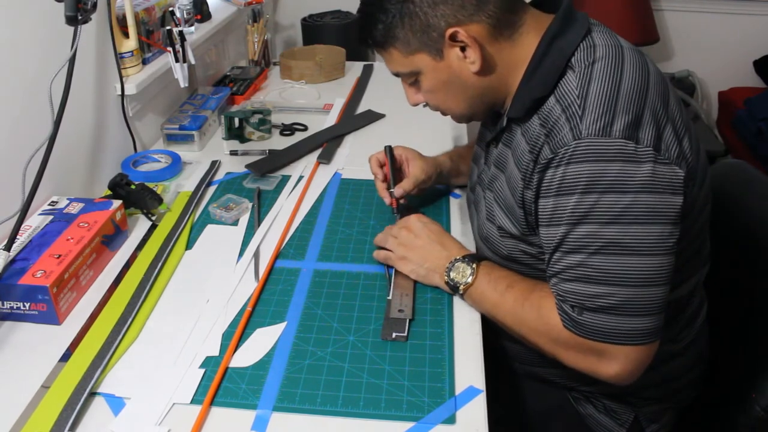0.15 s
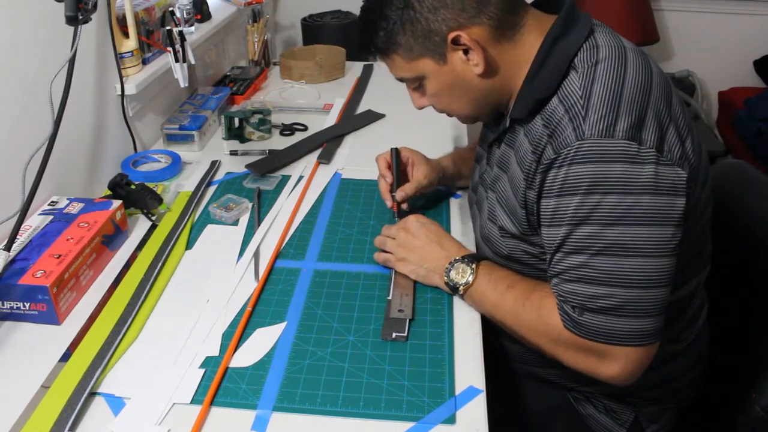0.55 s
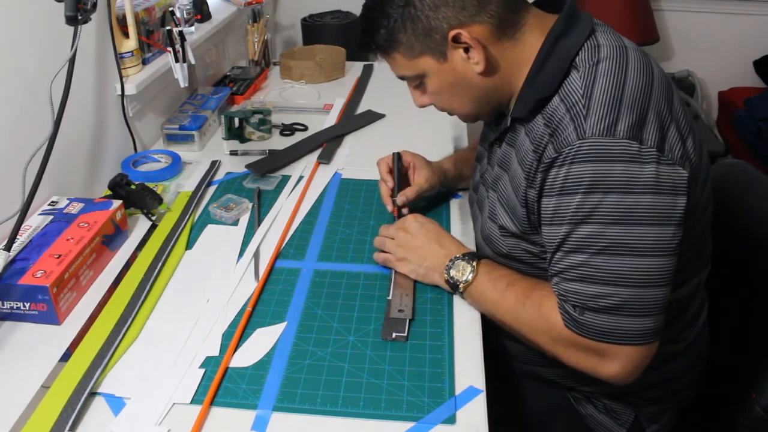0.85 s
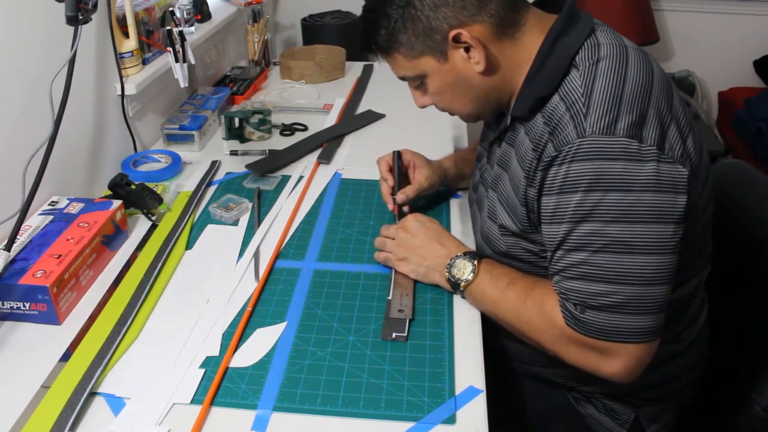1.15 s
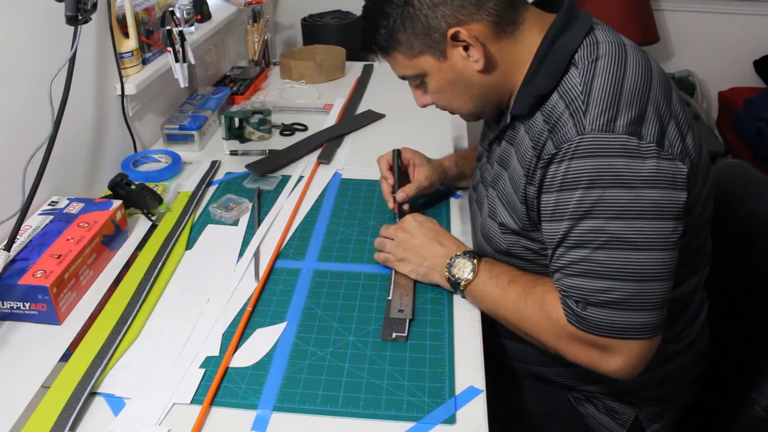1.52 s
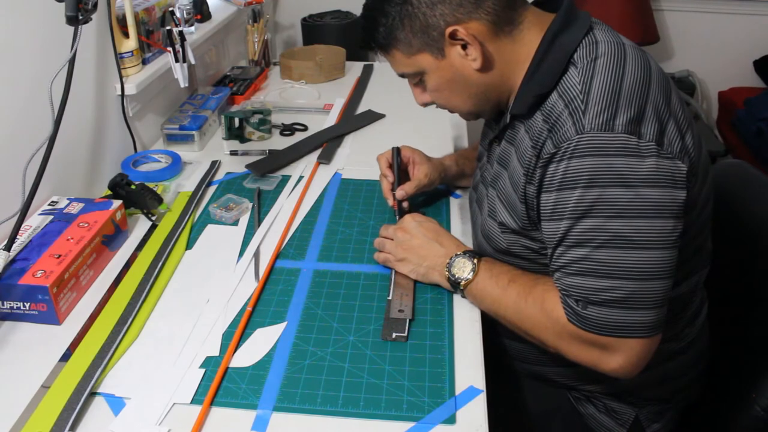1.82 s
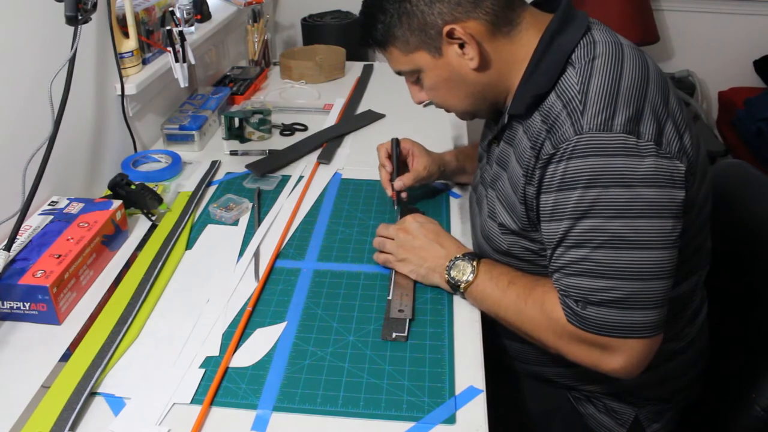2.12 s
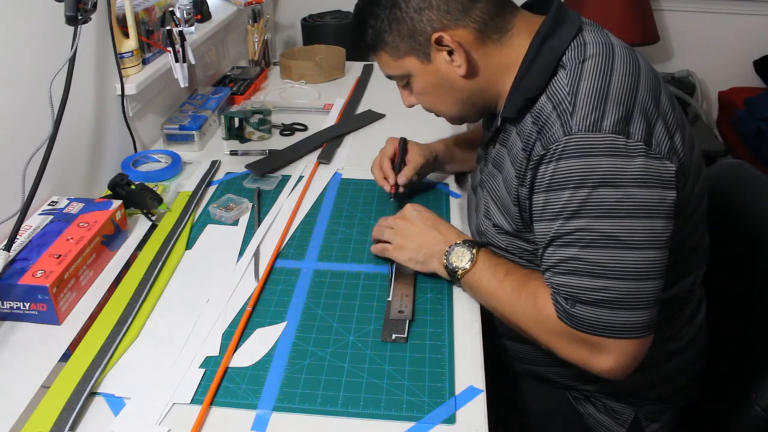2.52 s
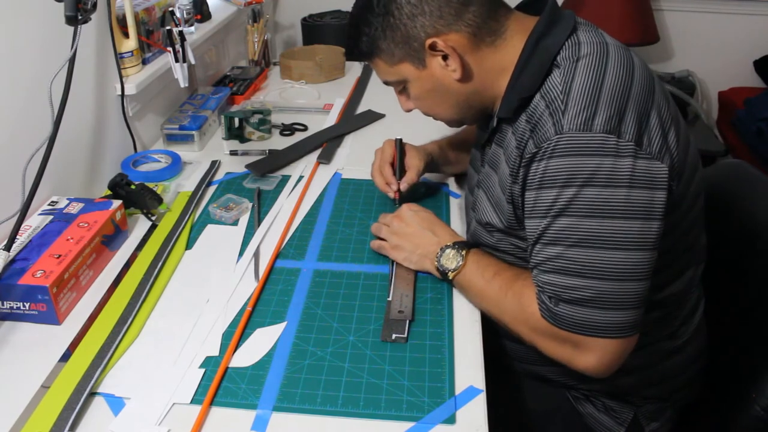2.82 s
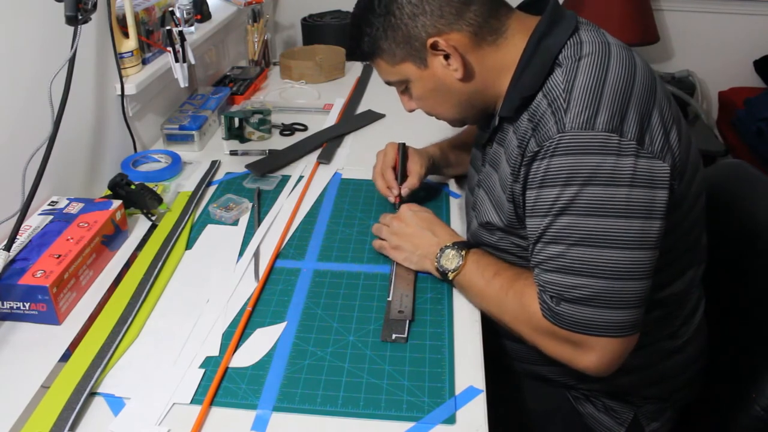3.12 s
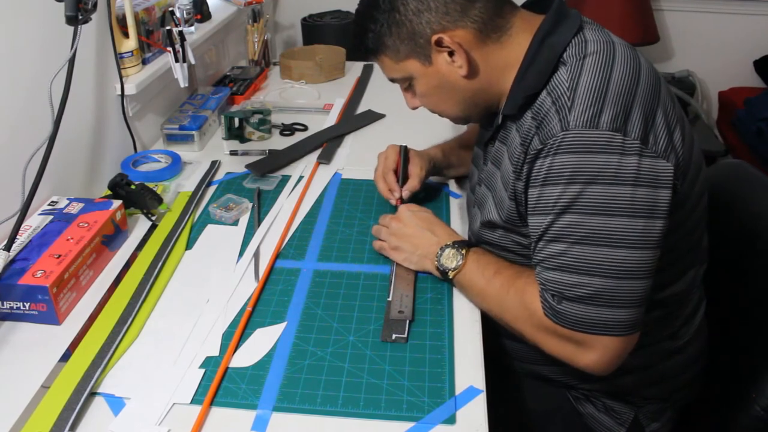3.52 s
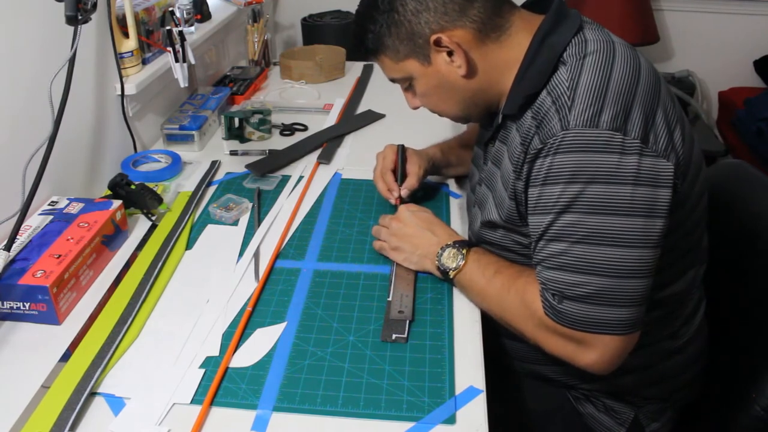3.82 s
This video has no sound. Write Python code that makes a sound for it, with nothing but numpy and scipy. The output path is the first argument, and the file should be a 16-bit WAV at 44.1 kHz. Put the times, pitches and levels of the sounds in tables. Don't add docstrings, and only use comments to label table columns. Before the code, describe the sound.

Crisp blade ticks and dry foam tearing open the scene, return in a busier middle burst, then soft scratches, a desk knock and final ticks, over motor hum and airy hiss in a small room.

```python
import sys
import numpy as np
from scipy import signal
from scipy.fft import rfft, irfft
from scipy.io import wavfile
from scipy.ndimage import uniform_filter1d

SR = 44100
rng = np.random.default_rng(int(sys.argv[2]) if len(sys.argv) > 2 else 0)


def amplitude_ratio(level_db):
    exponent = np.asarray(level_db, float) / 20
    return 10 ** exponent


def master_out(mix):
    frames = np.transpose(np.atleast_2d(mix))
    ceiling = np.clip(frames, -1, 1)
    pcm = np.round(ceiling * 32767).astype(np.int16)
    wavfile.write(sys.argv[1], SR, pcm)


N = 174195
LEFT_RIGHT = np.array([[1], [-1]])


def shape(table, f):
    hz, db = np.array(table, float).T
    return amplitude_ratio(np.interp(np.log(f + 1), np.log(hz), db))


def hump(hz, octaves, size):
    f = np.arange(size // 2 + 1) * SR / size
    return amplitude_ratio(-6 * (2 * np.log2((f + 1) / hz) / octaves) ** 2)


def level(x, db):
    return x * amplitude_ratio(db) / np.sqrt(np.mean(x ** 2))


def pan(db):
    return amplitude_ratio(LEFT_RIGHT * db / 2)


def walk(rate_hz):
    k = int(SR / rate_hz)
    steps = np.repeat(rng.standard_normal(N // k + 1), k)
    return 1.18 * uniform_filter1d(uniform_filter1d(steps, k), k)[:N]


def decay(t, t60_s):
    return np.exp(-np.log(1000) * t / t60_s)


def ring(hz, t60_s, size=4096):
    t = np.arange(size) / SR
    return np.sin(2 * np.pi * hz * t) * decay(t, t60_s)


def add(out, at_s, x):
    i = int(at_s * SR)
    x = x[max(-i, 0):max(N - i, 0)]
    out[max(i, 0):max(i, 0) + len(x)] += x


def shaped_noise(gain):
    return irfft(rfft(rng.standard_normal(N)) * gain, N)


def hum():
    # (multiple of motor frequency, rms [dB])
    motor_harmonics = [(1, -38), (2, -55.5), (3, -62), (5, -69)]
    motor_hz, mains_hz, fan_hz, beat_low_s = 117.591, 119.968, 36.6, -0.011
    t = np.arange(N) / SR - beat_low_s

    def tone(hz, db, sway_db):
        return amplitude_ratio(db + sway_db * walk(6.7)) * np.sqrt(2) * np.cos(2 * np.pi * hz * t)

    motor = sum(tone(k * motor_hz, db, 0.072 * k) for k, db in motor_harmonics)
    mains = tone(mains_hz, -46.5, 0.25)
    fan = tone(fan_hz, -57.5, 1.0)
    return (motor - mains) * pan(1.22) + fan * pan(1)


def duct_rumble():
    # (frequency [Hz], level [dB per Hz])
    rumble_spectrum = [(22, -41), (38, -23), (65, -8), (110, -12.5), (260, -7), (370, -6.5), (450, -19),
                       (700, -21.5)]
    # (frequency [Hz], width [Hz], level [dB])
    duct_modes = [(47.3, 6, 5), (56, 5.5, 7), (153, 23.4, 14.5), (253, 9.2, 5), (298, 21, 3.5),
                  (348, 71, 5.5), (610, 75, 6), (766, 9.9, 11)]
    rumble_db, side_db = -43, -18
    f = np.arange(N // 2 + 1) * SR / N
    gain = shape(rumble_spectrum, f) / (1 + (f / 800) ** 4)
    for hz, width_hz, db in duct_modes:
        gain = gain * (1 + (amplitude_ratio(db) - 1) / (1 + (2 * (f - hz) / width_hz) ** 2))
    mid, side = shaped_noise(gain), shaped_noise(gain)
    stereo = mid * pan(0.36) + LEFT_RIGHT * amplitude_ratio(side_db) * side
    return level(stereo * amplitude_ratio(0.47 * walk(11)), rumble_db)


def hiss():
    # (frequency [Hz], level [dB per Hz])
    hiss_spectrum = [(290, -40), (500, -3.5), (1200, -9.5), (1600, -13), (2610, -16.5), (7000, -22.5),
                     (11000, -27.5), (15500, -34)]
    # (frequency [Hz], side minus mid [dB])
    hiss_side = [(400, 3), (700, -2), (1300, 1), (2400, 3.5), (4400, 2.5), (6500, 1), (9000, -1)]
    hiss_db, low_cut_hz = -54.5, 336.0
    f = np.arange(N // 2 + 1) * SR / N
    gain = shape(hiss_spectrum, f) * f ** 4 / (f ** 4 + low_cut_hz ** 4)
    mid = shaped_noise(gain)
    side = shaped_noise(gain * shape(hiss_side, f))
    return level(mid + LEFT_RIGHT * side, hiss_db) * amplitude_ratio(0.11 * walk(2.64))


def room(x):
    t60_low_s, t60_high_s, gap_s = 0.39, 0.072, 0.0026
    room_db, side_db = -2, -6
    t = np.arange(16384) / SR
    mid, side = rng.standard_normal((2, len(t)))
    noise = mid + amplitude_ratio(side_db) * side * LEFT_RIGHT
    soft = signal.sosfilt(signal.butter(1, 3500, fs=SR, output="sos"), noise)
    tail = soft * decay(t, t60_low_s) + (noise - soft) * decay(t, t60_high_s)
    tail = tail * (t > gap_s)
    tail = tail * amplitude_ratio(room_db) / np.sqrt((tail ** 2).sum() / 2)
    return signal.fftconvolve(x[None], tail, axes=1)[:, :N] * pan(0.5)


def thuds():
    # (time [s], level [dB], frequency [Hz])
    desk_knocks = [
        (.077, -53, 900),
        (0.632, -55, 430),
        (1.898, -43, 159),
        (2.125, -40, 556),
        (3.343, -35.5, 590),
        (3.3497, -31, 341),
        (3.358, -31, 246),
        (3.373, -37, 530),
    ]
    t60_s, rise_s = 0.04, 0.00051
    out, t = np.zeros(N), np.arange(4096) / SR
    soft = 1 - np.exp(-t / rise_s)
    for s, db, hz in desk_knocks:
        modes = ring(hz, t60_s) + 0.28 * ring(hz * 0.56, t60_s) + 0.08 * ring(hz * 1.6, t60_s)
        add(out, s, amplitude_ratio(db) * soft * modes)
    return out


def ruler(spread_db):
    # (frequency [Hz], level [dB], t60 [s])
    ruler_modes = [(1560, 1, 0.019), (2720, -2.5, 0.024), (3990, 2, 0.012), (4900, -13, 0.14),
                   (6300, -27.5, 0.0083)]
    return sum(amplitude_ratio(db + extra) * ring(hz, t60_s) for (hz, db, t60_s), extra in zip(ruler_modes, spread_db))


def catches():
    blade_catches = [(0.023, -45, 3080, -4), (0.0282, -41, 3270, -7), (0.029, -38.5, 4530, -4),
                     (0.0615, -42, 1660, -4), (0.069, -39, 1770, 2), (0.0732, -33.5, 3600, -2),
                     (.0765, -37, 6950, -9), (.079, -40, 1780, 2), (0.101, -41.5, 1800, 0),
                     (.1125, -44, 1740, 0), (.499, -48, 4030, -11), (.529, -44, 5470, -9),
                     (.533, -52, 5030, -9), (0.6273, -35, 4430, -9), (0.6293, -38, 2240, 6),
                     (0.633, -36, 5060, 0), (0.6381, -37, 3980, -1), (0.643, -48, 5000, -4),
                     (1.047, -46.5, 3500, -8), (1.8127, -40, 5500, -11), (1.823, -43, 6000, -9),
                     (1.838, -26.5, 2775, 5), (1.843, -32.5, 2870, -1), (1.8475, -37, 4500, 3),
                     (1.852, -42, 4600, 7), (1.858, -48, 1800, -4), (2.0233, -31.5, 2790, -6),
                     (2.025, -36, 4900, 3), (2.036, -34.5, 4750, 4), (2.047, -37, 4200, -2),
                     (2.0748, -43, 3000, -3), (2.082, -46, 3860, -3), (2.1, -44, 3980, -9),
                     (2.1095, -41, 4500, -9), (2.1342, -42, 2290, -4), (2.139, -44, 2550, -2),
                     (2.1437, -43, 1800, -4), (2.1515, -39, 2100, 1), (2.167, -45, 4970, -6),
                     (2.177, -43, 2200, -7), (2.485, -45, 3600, 10), (2.547, -47, 2480, -9),
                     (2.838, -43, 3280, 8), (3.088, -47, 2700, -8), (3.1368, -41, 2500, -11),
                     (3.162, -39.5, 2720, -4), (3.8718, -41.5, 5950, -10), (3.9327, -40.5, 2690, 0),
                     (3.937, -39, 7100, -4),
                     (1.053, -46, 5000, -9), (1.057, -44, 10000, -12), (1.26, -44, 11000, -12),
                     (1.798, -40, 6900, -11), (2.439, -52, 3500, -4), (2.451, -46, 2000, -3),
                     (2.463, -45, 3800, -4), (2.475, -44, 1600, -3), (2.477, -47, 3670, 0),
                     (2.709, -48, 3100, -2), (2.828, -43, 3560, -9), (2.853, -48, 3300, -4),
                     (3.094, -48, 4600, 2), (3.112, -45, 3280, -9), (3.122, -49, 1800, -4),
                     (3.148, -46, 3200, -6), (3.167, -46, 4800, -4), (3.877, -46, 5540, -2),
                     (3.942, -48, 3500, -6), (3.9487, -42, 4000, -12)]
    crack_db, crack_s, crack_rise_s, crack_octaves = 1.5, 0.0026, 0.00018, 1.44
    ring_t60_s, ring_rise_s, ruler_db = 0.016, 0.0012, -11.5
    out, t = np.zeros(N), np.arange(4096) / SR
    crack_fade = np.exp(-t / crack_s) * (1 - np.exp(-t / crack_rise_s))
    for s, db, hz, ring_db in blade_catches:
        noise = rng.standard_normal(4096)
        crack = irfft(rfft(noise) * hump(hz, crack_octaves, 4096)) * crack_fade
        x = amplitude_ratio(ring_db) * ring(hz, ring_t60_s) * (1 - np.exp(-t / ring_rise_s))
        x = x + amplitude_ratio(crack_db) * crack
        x = x + amplitude_ratio(ruler_db) * ruler(1.2 * rng.standard_normal(5))
        add(out, s, x * amplitude_ratio(db) / np.abs(x).max())
    return out


def foam_grains():
    grains_per_s, spread_db, spread_cap, grain_s, patchy_db = 5500, 2, 3.5, 0.00185, 2.2
    bursts = (rng.random(N) < grains_per_s / SR) * rng.standard_normal(N)
    bursts = bursts * amplitude_ratio(spread_db * np.minimum(rng.exponential(size=N), spread_cap))
    cell = rng.standard_normal(512) * np.exp(-np.arange(512) / SR / grain_s)
    cell = irfft(np.exp(1j * np.angle(rfft(cell, 2048))))
    grains = signal.fftconvolve(bursts * amplitude_ratio(patchy_db * walk(140)), np.roll(cell, 256))
    return np.tile(grains[256:N + 256], 2)


def tears():
    # (time [s], length [s], level [dB], centre [Hz], width [octaves])
    blade_drags = [(-.02, 0.092, -48.5, 4860, 1.66), (0.053, 0.058, -55.5, 1680, 0.35),
                   (0.47, 0.21, -63, 5000, 2.2), (0.83, 0.24, -62.5, 700, 1.4),
                   (1.01, 0.11, -65, 4000, 3.5), (1.184, 0.11, -64, 4000, 2.8),
                   (1.992, 0.032, -54.5, 4000, 2.2), (2.019, 0.038, -54.5, 1560, 0.24),
                   (2.064, 0.063, -50.5, 3000, 2.4), (2.095, 0.029, -52.5, 5000, 2.3),
                   (2.116, 0.069, -50.5, 2840, 3.9), (2.16, 0.043, -56, 5350, 2.2),
                   (2.408, 0.12, -54.5, 2800, 2.9), (2.54, 0.046, -60, 3000, 2.7),
                   (2.685, 0.083, -59.5, 3780, 1.4), (2.812, 0.065, -54, 3220, 2.6),
                   (2.93, 0.041, -58.5, 1480, 1.7), (3.075, 0.14, -58.5, 3100, 2.5),
                   (3.335, 0.026, -55.5, 2300, 3), (3.896, 0.058, -56.5, 5500, 2.1)]
    # (time [s], t60 [s], level [dB], centre [Hz], width [octaves])
    snap_rips = [(.072, 0.091, -41, 5100, 1.4), (0.627, 0.14, -50, 3320, 1.2),
                 (0.628, 0.17, -52.5, 5060, 0.28), (.628, 0.062, -55, 10000, 0.71),
                 (1.811, 0.2, -45.5, 6400, 2.1), (1.838, 0.16, -50.5, 3780, 1.3),
                 (1.837, 0.041, -44, 9500, 1.9), (2.023, 0.23, -48, 4470, 2.3),
                 (2.022, 0.059, -52, 9500, 1.2), (3.869, 0.16, -52.5, 5950, 1.1),
                 (3.93, .15, -55, 6000, 3.3)]
    drag_rise, rip_rise_s = 0.31, 0.0014
    ruler_db, desk_db, desk_hz, desk_octaves = -36, -4, 850, 2.85
    out, size = np.zeros(N), 16384
    t = np.arange(size) / SR
    grains = foam_grains()
    steel = np.abs(rfft(ruler(np.zeros(5)), size))
    steel = 1 + amplitude_ratio(ruler_db) * steel / steel.mean()
    desk = amplitude_ratio(desk_db) * hump(desk_hz, desk_octaves, size)

    def tear(from_s, db, hz, octaves):
        piece = grains[int(from_s * SR):][:size]
        return level(irfft(rfft(piece) * (steel * hump(hz, octaves, size) + desk)), db)

    for s, length_s, db, hz, octaves in blade_drags:
        u = t / length_s
        ramp = np.minimum(u / drag_rise, (1 - u) / (1 - drag_rise))
        push = np.sin(np.pi / 2 * np.clip(ramp, 0, 1))
        add(out, s, tear(s + 1, db, hz, octaves) * push)
    for s, t60_s, db, hz, octaves in snap_rips:
        snap = decay(t, t60_s) * (1 - np.exp(-t / rip_rise_s))
        add(out, s, tear(s + 1.5, db, hz, octaves) * snap)
    return out


def scene():
    pan_db, lag_samples, nick_room_db = 4, 2, -13
    nicks, foam = catches() + thuds(), tears()
    knife = nicks + foam
    near = np.array([knife, np.roll(knife, lag_samples)]) * pan(pan_db)
    return near + room(amplitude_ratio(nick_room_db) * nicks + foam) + hum() + duct_rumble() + hiss()


def roll_off(x):
    return signal.sosfilt(signal.butter(12, 15710, fs=SR, output="sos"), x)


def record(dry):
    side_top_hz, top_hz, side_treble_db, fold_db = 7500, 15700, -16, 3
    f = np.arange(N // 2 + 1) * SR / N
    mid, side = rfft(dry[0] + dry[1]) / 2, rfft(dry[0] - dry[1]) / 2
    mid = mid * np.where(f < side_top_hz, 1, amplitude_ratio(fold_db))
    side = side * np.where(f < side_top_hz, 1, amplitude_ratio(side_treble_db))
    mix = irfft(np.array([mid + side, mid - side]) * (f < top_hz), N)
    return roll_off(mix)


dry = scene()
out = record(dry)
master_out(out)
```